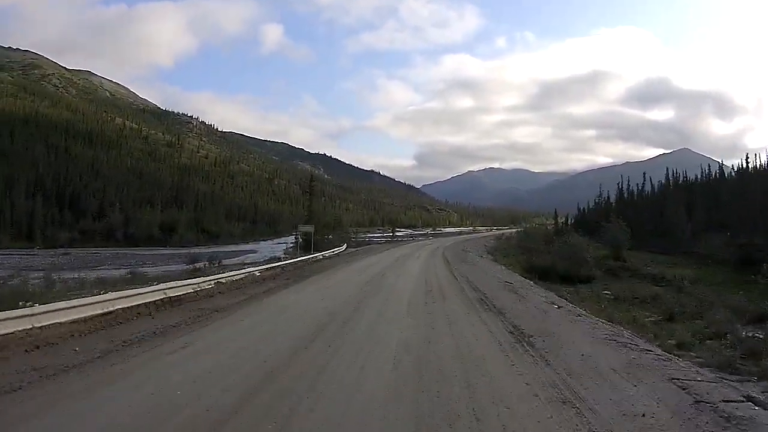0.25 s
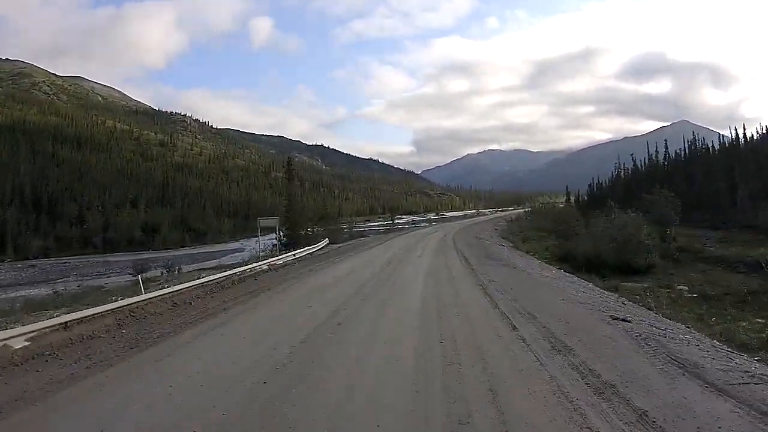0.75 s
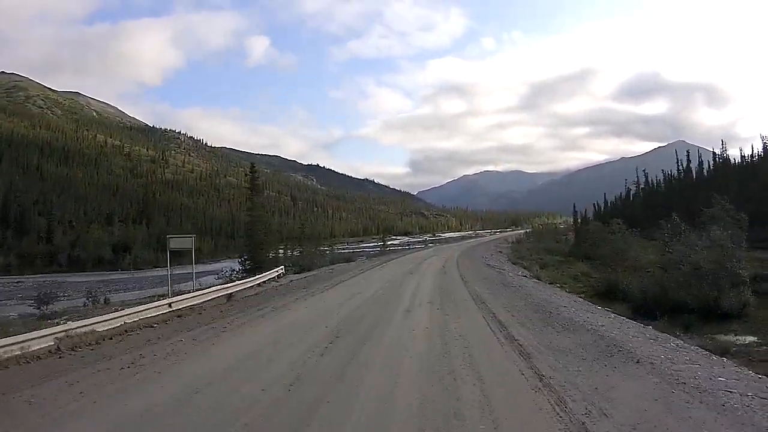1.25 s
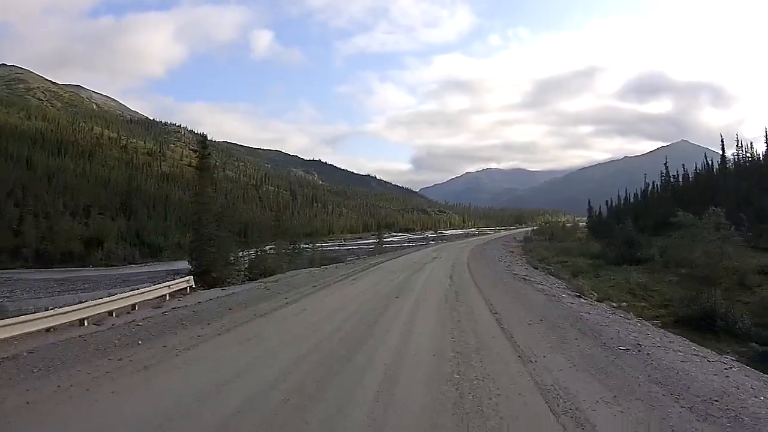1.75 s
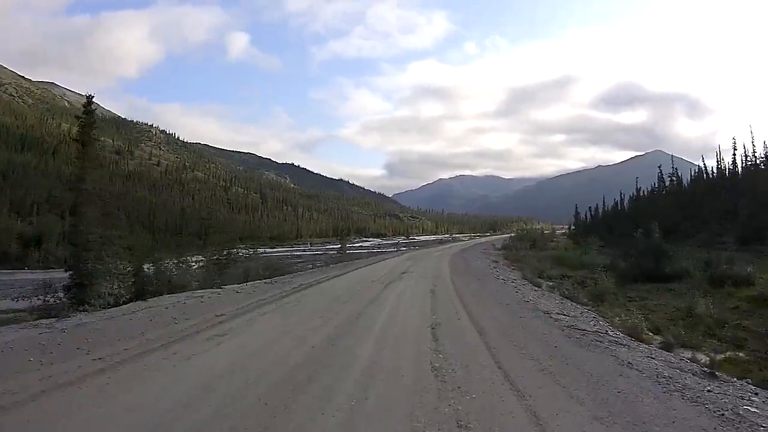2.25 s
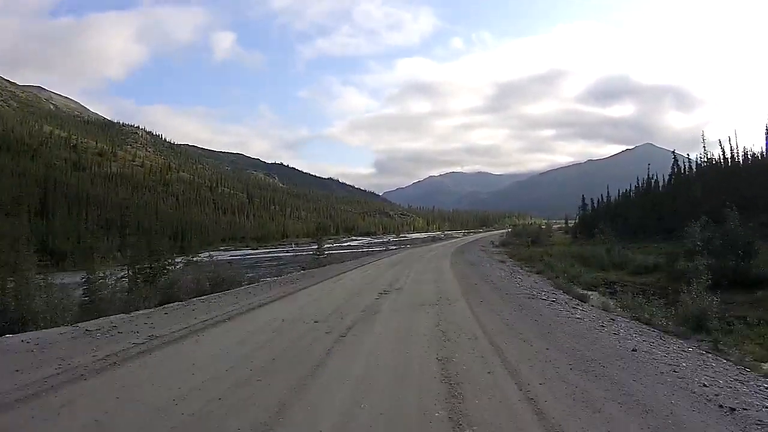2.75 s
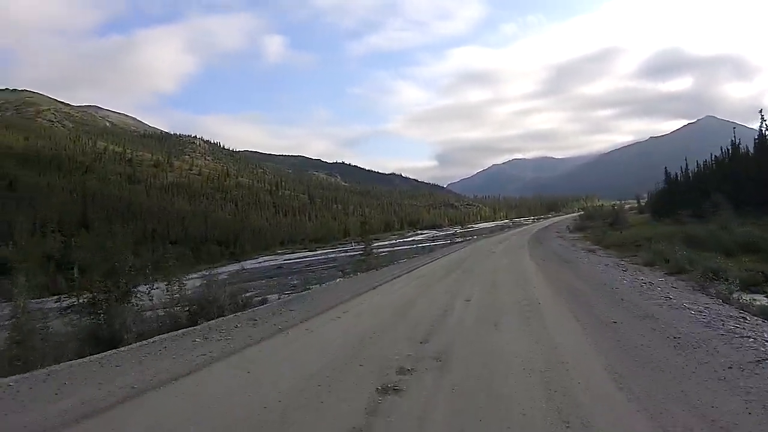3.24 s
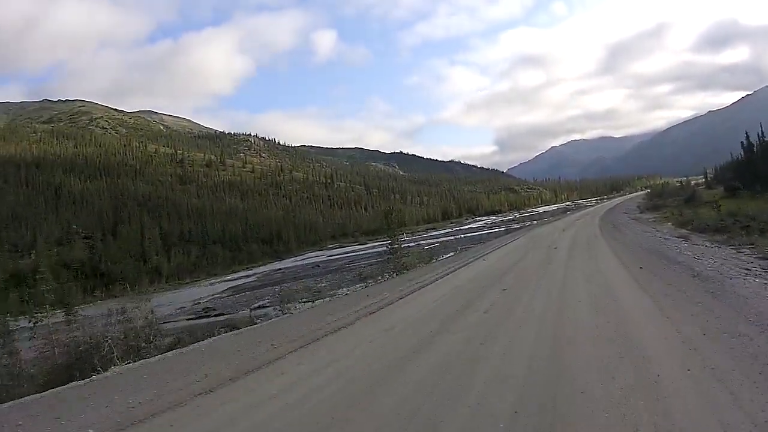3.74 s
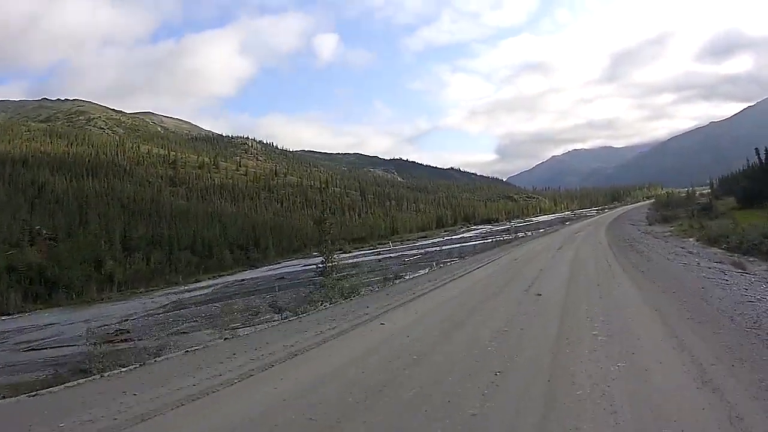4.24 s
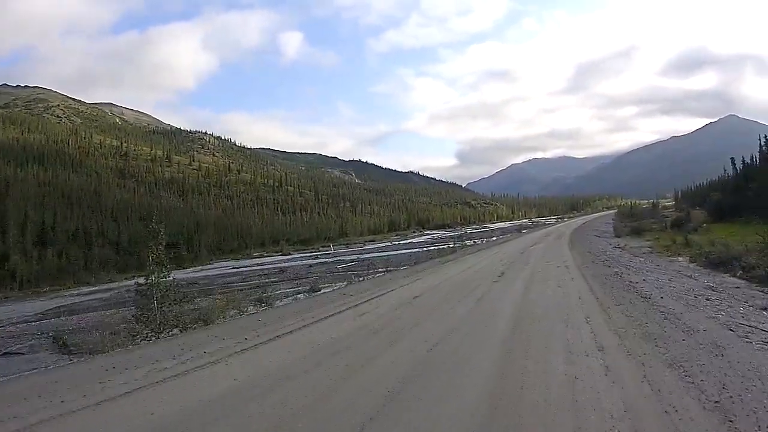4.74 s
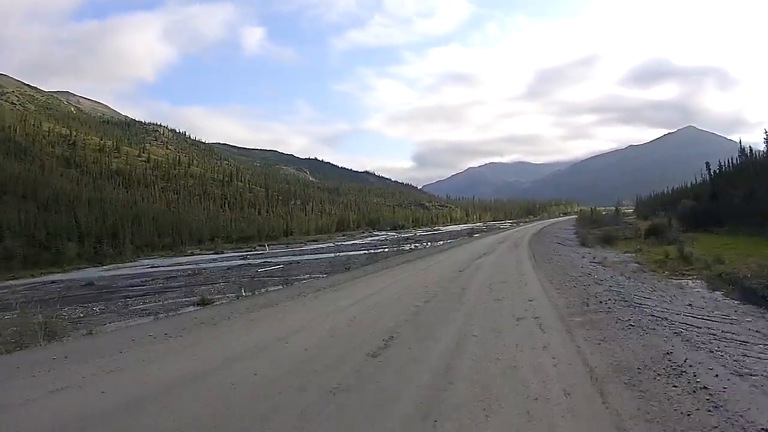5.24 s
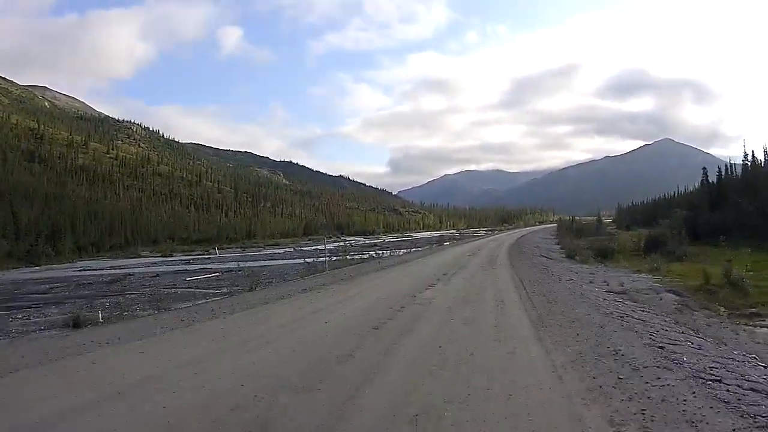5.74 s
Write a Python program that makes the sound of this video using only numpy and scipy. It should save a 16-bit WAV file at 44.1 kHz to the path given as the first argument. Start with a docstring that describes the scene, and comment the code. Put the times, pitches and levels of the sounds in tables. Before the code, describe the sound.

A vehicle rolls along a gravel road, its dense gritty crunch fading briefly and returning over a steady tyre hiss and faint rumble.

```python
"""On a gravel road, a rolling vehicle is heard through a small enclosed microphone.
Grit cracks under the tyres: many random impulses merge into a dense crackle, which thins out over a
smoother stretch and returns. Thrown dust sizzles above it; single stones and duller knocks on the body
ring as damped oscillators. Underneath lie the resonant rumble of the body shell, a wavering
drive-line hum, and the steady broadband hiss of the tread with a faint whine in it."""
import sys
import numpy as np
from scipy import signal
from scipy.fft import rfft, irfft
from scipy.io import wavfile

SR = 44100
rng = np.random.default_rng(int(sys.argv[2]) if len(sys.argv) > 2 else 0)


def store_wav(level_fs):
    """Save 16-bit WAV to argv[1]."""
    pcm = np.round(np.clip(np.atleast_2d(level_fs), -1, 1) * 32767)
    wavfile.write(sys.argv[1], SR, pcm.T.astype(np.int16))


N = 264157

# Crackle of loose gravel under the tyres: time_s, level_db
CRACKLE_LEVEL = [(0, -31.5), (.12, -32.5), (.3, -29.5), (.7, -30.5), (1.1, -31), (1.9, -32.5), (2.45, -31),
                 (2.9, -31.5), (3.25, -33), (3.44, -45), (3.7, -51), (3.95, -59), (4.05, -62.5), (4.4, -67),
                 (4.5, -56.5), (4.85, -49), (5.07, -39), (5.3, -39.5), (5.5, -36), (5.99, -36)]
# Share of fine, bright grit in the crackle: time_s, power_fraction
FINE_SHARE = [(0, 0), (.6, 0.11), (1.5, 0.23), (2.5, 0.17), (3.2, 0.2), (3.45, 1), (4.6, 0.91), (5.2, 0.81),
              (5.99, 0.66)]
# Spectra of coarse grit, fine grit and thrown dust: frequency_hz, relative_db
COARSE_SPECTRUM = [(150, -65), (300, -29.5), (450, -28), (880, -21), (1240, -12.5), (1570, -12),
                   (2970, 0.5), (3400, 3.5), (5800, -9), (7500, -27.5), (10000, -45.5), (15200, -79)]
FINE_SPECTRUM = [(150, -40), (300, -24), (700, -21.5), (1320, -12.5), (1650, -14), (3840, 2.5), (6000, -3),
                 (8000, -18), (10500, -38), (15200, -60.5)]
DUST_SPECTRUM = [(1000, -52), (3000, -7), (6500, 4), (8500, -7.5), (10800, -22), (12500, -18.5),
                 (14000, -23), (15300, -24)]
# Sprays where a tyre hits a loose patch: centre_s, length_s, crackle_db, dust_db
LOOSE_PATCHES = [(.035, 0.048, -32.5, -58), (.3, .03, -38, -52), (.585, 0.024, -32.5, -47),
                 (.69, 0.052, -31, -54), (1.12, .012, -31, -38), (1.97, .012, -34, -43),
                 (2.05, 0.02, -37, -46), (2.097, 0.01, -37, -46), (2.44, 0.027, -48, -56),
                 (2.75, 0.027, -37, -52), (3.41, 0.022, -42, -51), (3.48, 0.014, -43, -59),
                 (3.535, 0.012, -45, -52), (3.597, .018, -41, -46), (3.63, 0.045, -50, -52),
                 (3.76, 0.019, -58, -52), (3.895, 0.018, -55, -55), (4.455, 0.012, -54, -57),
                 (4.485, .02, -54, -58), (4.585, 0.022, -47.5, -58), (4.62, .012, -47, -62),
                 (4.68, .06, -46, -59), (4.738, .01, -45, -53), (4.96, 0.018, -40.5, -53),
                 (5.072, 0.017, -37, -57), (5.175, 0.017, -36.5, -46), (5.41, 0.011, -44, -57),
                 (5.7, .03, -41, -57), (5.86, 0.019, -55, -59)]
# The loudest stones, and duller knocks on the body: start_s, peak_db, pitch_hz
STONE_STRIKES = [(0.0226, -13.5, 4040), (0.398, -19, 3100), (0.5458, -19, 3560), (0.5751, -24, 4100),
                 (0.687, -16, 3300), (0.818, -16, 3230), (0.971, -14.5, 3030), (1.0216, -12.5, 3180),
                 (1.173, -15, 4010), (1.7872, -14.5, 3770), (2.156, -17, 3570), (2.7077, -17, 3140),
                 (2.8766, -13, 3900), (2.9407, -20, 2940), (2.9885, -18.5, 3440), (3.0636, -18, 3040),
                 (3.2931, -18, 3820), (3.7654, -41, 4480), (3.806, -39, 2600), (4.4506, -42, 2607),
                 (4.735, -32.5, 2700), (4.952, -25, 5300), (5.0719, -25, 3940), (5.1093, -24, 3930),
                 (5.1701, -22, 3880), (5.4003, -20, 4140), (5.4068, -18.5, 3900), (5.4184, -22, 4320),
                 (5.657, -28, 3700), (5.6896, -19, 3750), (5.7036, -17, 3830), (5.8486, -26, 4370),
                 (5.8694, -18, 3930)]
BODY_KNOCKS = [(.5775, -27, 1600), (.648, -32, 1500), (.6795, -25, 1510), (3.2945, -36, 1100),
               (3.7514, -39, 450)]
# Rumble of the body shell: time_s, level_db
RUMBLE_LEVEL = [(0, -67), (.9, -65.5), (2, -67), (3.3, -66.5), (3.55, -65), (3.95, -61), (5.2, -62.5),
                (5.4, -67), (5.99, -64.5)]
# Bumps that shake the body: centre_s, length_s, level_db
ROAD_BUMPS = [(1.08, .08, -65), (1.53, 0.09, -66), (1.73, 0.074, -71), (1.98, .08, -64), (3.53, .04, -58),
              (3.6, 0.033, -59), (3.75, .06, -65), (3.88, .08, -62)]
# Resonances of the body shell: frequency_hz, relative_db
BODY_SPECTRUM = [(8, -24), (25, -17), (50, -5), (62, -7.5), (71, 4.5), (82, -7), (105, -6), (135, -6),
                 (168, 0.5), (200, -5.5), (270, -4.5), (360, -13.5), (700, -37)]
# Tone of the drive line: time_s, pitch_hz, level_db
DRIVE_HUM = [(0, 262.3, -69.5), (.9, 256.7, -70), (2.1, 258.5, -78), (3, 259.7, -71), (4.5, 256, -69.5),
             (5.99, 256, -69.5)]
# Spectrum of the tread hiss: frequency_hz, relative_db
TREAD_SPECTRUM = [(200, -31.5), (350, -10), (550, -4), (900, -7), (1150, -2), (1800, -7.5), (2300, -1.5),
                  (3200, -2.5), (4000, -2.5), (6500, -6.5), (8500, -19), (10800, -34), (12500, -38),
                  (15300, -43)]
# Noise bands of the whine: pitch_hz, resonator_width_hz, level_db
WHINE_BANDS = [(2607, 25, -71), (2600, 300, -63.5)]
# Self-noise of the microphone: frequency_hz, relative_db
MIC_SPECTRUM = [(6000, -30), (10500, -12), (12500, -5), (15300, 3)]

FULL_CRACKLE_DB, FULL_CRACKS_PER_S, FULL_DUST_DB = -31, 3300, -49.5
RATE_SLOPE, DUST_SLOPE = 0.3, 0.31   # dB per dB of crackle level
DUST_THRESHOLD_DB = -58   # crackle level below which the dust dies away
TREAD_DB, MIC_HISS_DB, CUTOFF_HZ = -55, -86, 15300


def gravel_crackle():
    """Incoherent addition: grains crack at random, in clumps, and their powers sum; dust lies above."""
    level_db, = in_time(CRACKLE_LEVEL)
    spray_power, spray_dust_power = power_bursts(LOOSE_PATCHES)
    fine = np.clip(in_time(FINE_SHARE)[0], 0, 1)
    per_s = FULL_CRACKS_PER_S * from_db(RATE_SLOPE * (level_db - FULL_CRACKLE_DB))
    clumps = from_db(0.23 * drift(30) + 0.26 * drift(85) + 1.87 * drift(380))
    envelope = np.sqrt(from_db(level_db) ** 2 + spray_power)
    force = envelope * grains(per_s, clumps, spread_db=4.54, bed_db=-4)
    size_class = rng.integers(0, 5, N)
    cracks = np.zeros(N)
    for k, stretch in enumerate(from_db(1.01 * np.linspace(-1, 1, 5))):   # smaller grains ring higher
        class_force = force * (size_class == k)
        cracks += colour(class_force * np.sqrt(1 - fine), COARSE_SPECTRUM, stretch)
        cracks += colour(class_force * np.sqrt(fine), FINE_SPECTRUM, stretch)
    return cracks + thrown_dust(level_db, per_s, clumps, spray_dust_power)


def grains(per_s, clumps, spread_db, bed_db):
    """Shot noise: Poisson clicks of uneven size over a bed of finer grinding, scaled to rms 1."""
    sizes = from_db(spread_db * np.minimum(rng.exponential(1, N), 3.0)) * rng.choice([-1, 1], N)
    clicks = sizes * (rng.random(N) < per_s / SR) / np.sqrt(per_s)
    grinding = from_db(bed_db) * rng.standard_normal(N)
    return rms_one(clumps * (rms_one(clicks) + grinding))


def thrown_dust(crackle_db, cracks_per_s, clumps, spray_power):
    """Shot noise of small particles: a denser, brighter sizzle that follows the crackle's level."""
    thrown = 1 / (1 + from_db(2 * (DUST_THRESHOLD_DB - crackle_db)))
    dust_db = FULL_DUST_DB + DUST_SLOPE * (crackle_db - FULL_CRACKLE_DB) + 0.87 * drift(11)
    envelope = np.sqrt(thrown * from_db(dust_db) ** 2 + spray_power)
    force = envelope * grains(1.5 * cracks_per_s, clumps, spread_db=6.0, bed_db=-1)
    return colour(force, DUST_SPECTRUM)


def impacts(table, decay_cycles):
    """Damped free vibration: each blow starts a sinusoid that falls 60 dB in decay_cycles."""
    out = np.zeros(N)
    for start_s, peak_db, pitch_hz in table:
        start = round(start_s * SR)
        cycles = np.arange(min(SR // 50, N - start)) * pitch_hz / SR
        attack = 1 - np.exp(-cycles / 0.61)
        ring = np.sin(2 * np.pi * cycles) * attack * from_db(-60 * cycles / decay_cycles)
        out[start:start + len(ring)] += from_db(peak_db) * ring / np.abs(ring).max()
    return out


def body_rumble():
    """Forced vibration: uneven shaking drives the shell's low resonances, and bumps add power."""
    level_db, = in_time(RUMBLE_LEVEL)
    bump_power, = power_bursts(ROAD_BUMPS)
    shaking = rng.standard_normal(N) * from_db(1.3 * drift(16) + 1.6 * drift(5.5))
    boom = rms_one(colour(shaking, BODY_SPECTRUM))
    return np.sqrt(from_db(level_db) ** 2 + bump_power) * boom


def drive_line_hum():
    """Frequency and amplitude modulation: one tone wavers slightly in pitch and level."""
    pitch_hz, level_db = in_time(DRIVE_HUM)
    phase = 2 * np.pi * np.cumsum(pitch_hz + 0.9 * drift(3.5)) / SR
    return from_db(level_db + 1.1 * drift(3.3)) * np.sqrt(2) * np.sin(phase)


def tread_hiss():
    """Broadband rolling noise: the tread hisses without pause, with a slight flutter in level."""
    return from_db(TREAD_DB + 0.24 * drift(60)) * colour(rng.standard_normal(N), TREAD_SPECTRUM)


def whine():
    """Narrow-band noise: two resonators in series give white noise a faint pitch."""
    noise = rng.standard_normal(N)
    out = np.zeros(N)
    for pitch_hz, width_hz, level_db in WHINE_BANDS:
        band = resonance(resonance(noise, pitch_hz, width_hz), pitch_hz, width_hz)
        out += from_db(level_db) * rms_one(band)
    return out


def from_db(db):
    """Logarithmic level: 20 dB is a factor of ten in amplitude."""
    return 10 ** (np.asarray(db) / 20)


def rms_one(x):
    """Normalisation to unit mean power."""
    return x / np.sqrt(np.mean(x ** 2) + 1e-20)


def in_time(table):
    """Linear interpolation of each column after time_s to every sample."""
    time_s, *columns = np.transpose(table)
    return [np.interp(np.arange(N) / SR, time_s, column) for column in columns]


def power_bursts(table):
    """Addition of powers: Gaussian bursts, one sum for each level column."""
    centre_s, length_s, *levels = np.transpose(table)
    grid_s = np.arange(0, N / SR + .001, .001)
    bells = np.exp(-(2 * (grid_s[:, None] - centre_s) / length_s) ** 2)
    return [np.interp(np.arange(N) / SR, grid_s, bells @ from_db(db) ** 2) for db in levels]


def drift(corner_hz):
    """Random fluctuation of rms 1: noise through two one-pole low-passes in their steady state."""
    pole = np.exp(-2 * np.pi * corner_hz / SR)
    smoothed = signal.lfilter([1], [1, -2 * pole, pole * pole], rng.standard_normal(N + SR))
    return rms_one(smoothed[SR:])


def colour(x, spectrum, stretch=1):
    """Minimum-phase filtering at unit power gain, by a spectrum stretched in frequency."""
    size = 8192
    hz, db = np.transpose(spectrum)
    grid_hz = np.maximum(np.arange(size // 2 + 1), 1) * SR / size
    gain_db = np.interp(np.log(grid_hz), np.log(hz * stretch), db)
    cepstrum = irfft(gain_db * np.log(10) / 20)
    cepstrum[1:size // 2] *= 2   # folding onto positive time makes the response causal
    cepstrum[size // 2 + 1:] = 0
    response = irfft(np.exp(rfft(cepstrum)))
    return signal.fftconvolve(x, response / np.sqrt(np.sum(response ** 2)))[:N]


def resonance(x, pitch_hz, width_hz):
    """Two-pole resonator with unit gain at its peak."""
    radius = np.exp(-np.pi * width_hz / SR)
    gain = (1 - radius ** 2) / 2
    feedback = [1, -2 * radius * np.cos(2 * np.pi * pitch_hz / SR), radius ** 2]
    return signal.lfilter([gain, 0, -gain], feedback, x)


def scene():
    """Superposition: the pressures of all sources add at one microphone."""
    stones = impacts(STONE_STRIKES, decay_cycles=10.6)
    knocks = impacts(BODY_KNOCKS, decay_cycles=2.8)
    return (gravel_crackle() + stones + knocks + body_rumble() + drive_line_hum() + tread_hiss() + whine())[None]


def record(dry):
    """Noise floor and band limit: the microphone adds faint hiss, and a steep low-pass cuts the top."""
    hiss = from_db(MIC_HISS_DB) * colour(rng.standard_normal(N), MIC_SPECTRUM)
    low_pass = signal.ellip(12, .5, 60, CUTOFF_HZ, fs=SR, output="sos")
    return signal.sosfilt(low_pass, dry + hiss)


dry = scene()
out = record(dry)
store_wav(out)
```